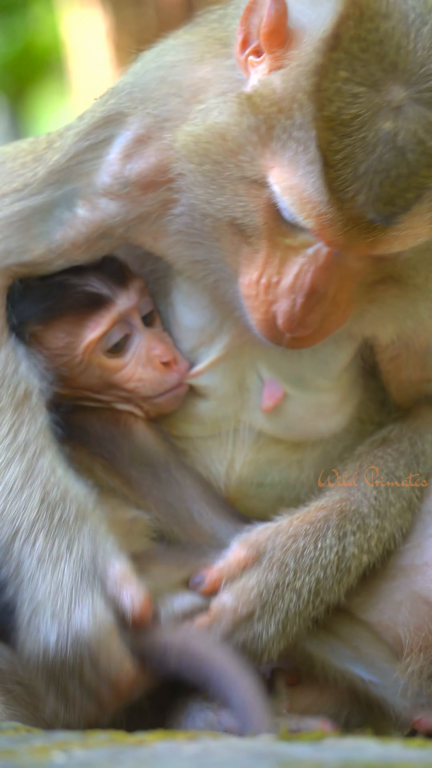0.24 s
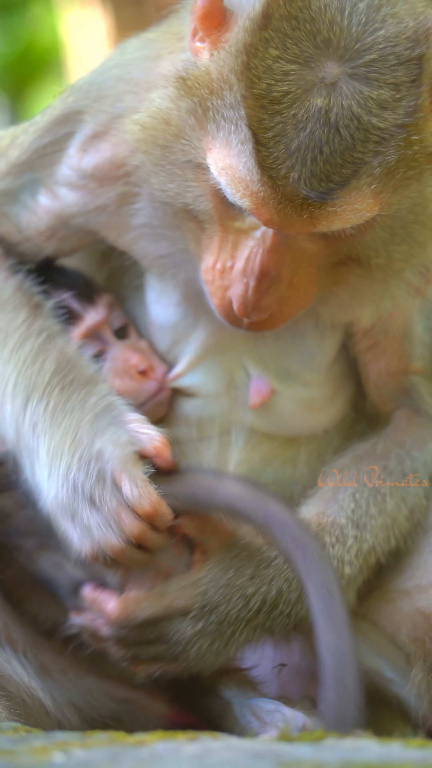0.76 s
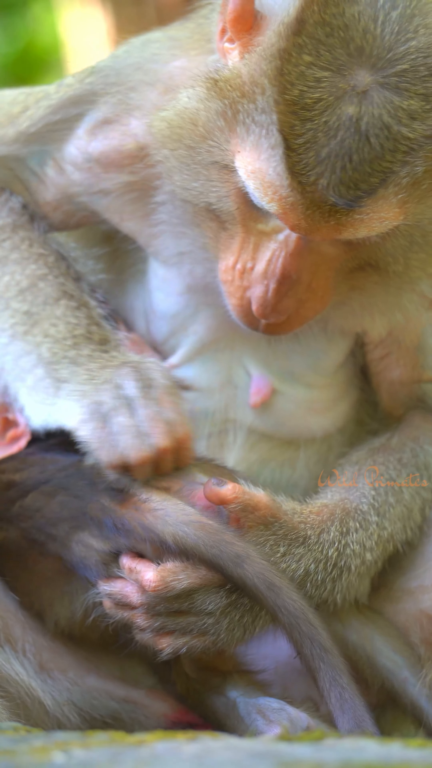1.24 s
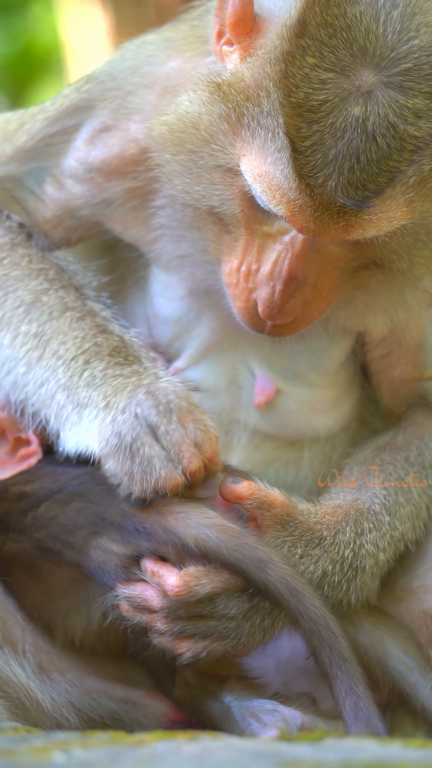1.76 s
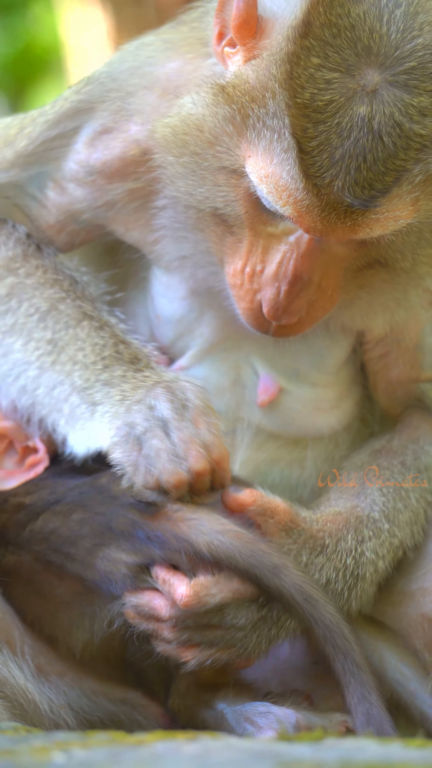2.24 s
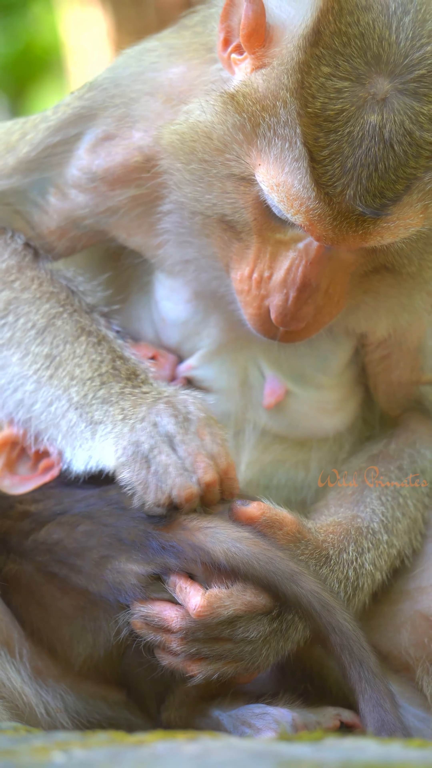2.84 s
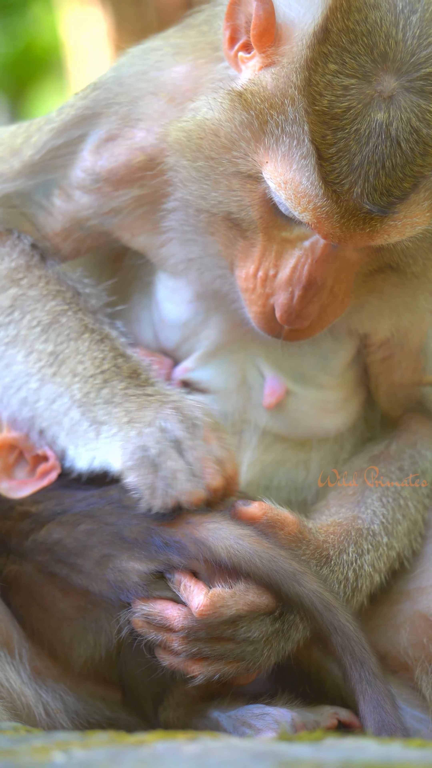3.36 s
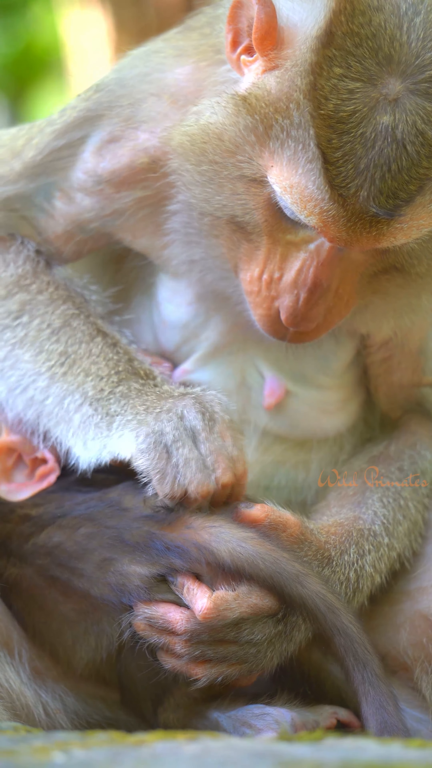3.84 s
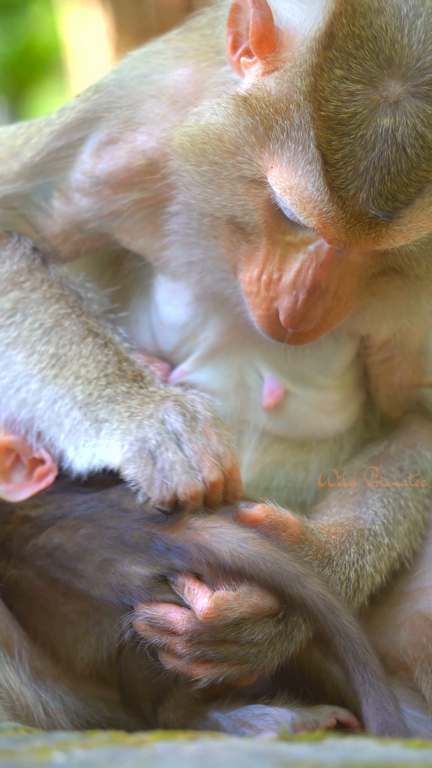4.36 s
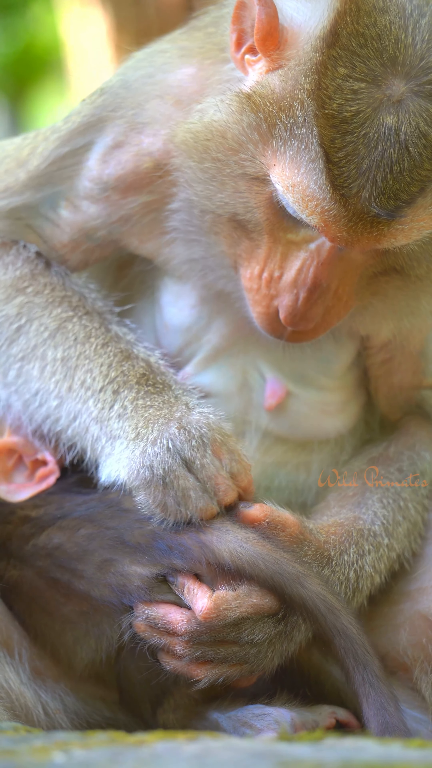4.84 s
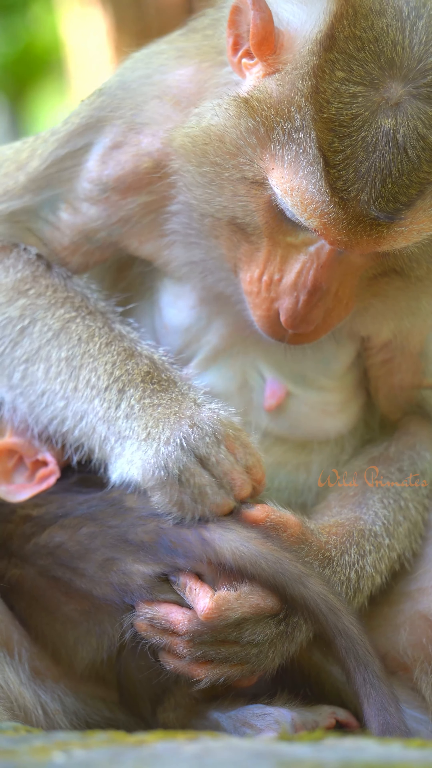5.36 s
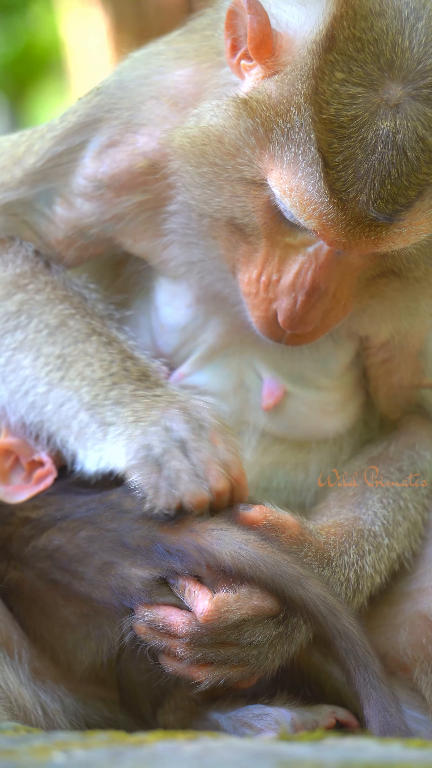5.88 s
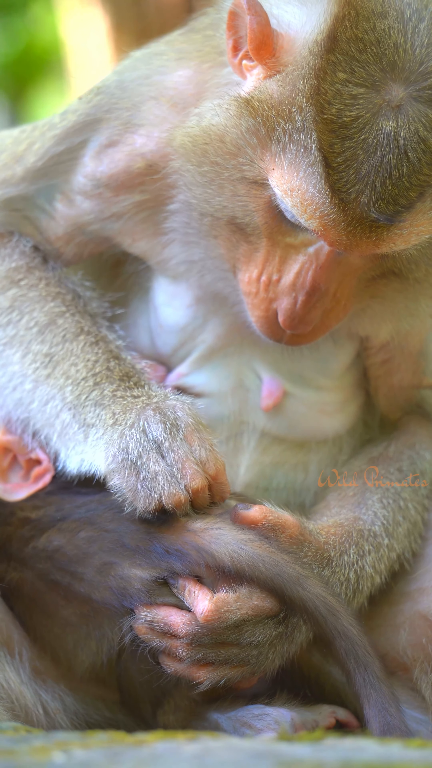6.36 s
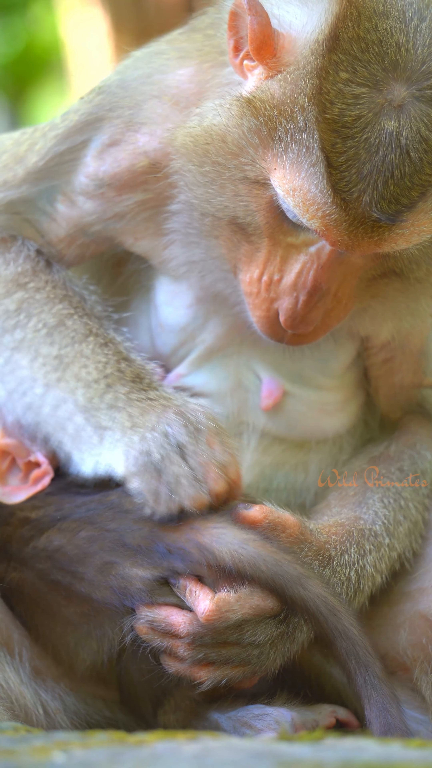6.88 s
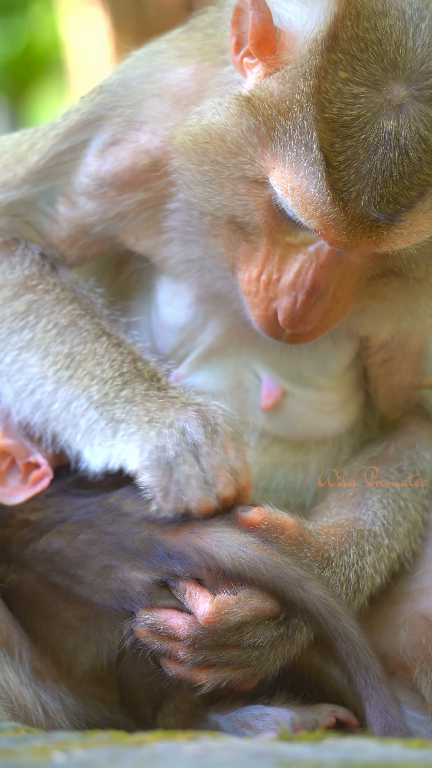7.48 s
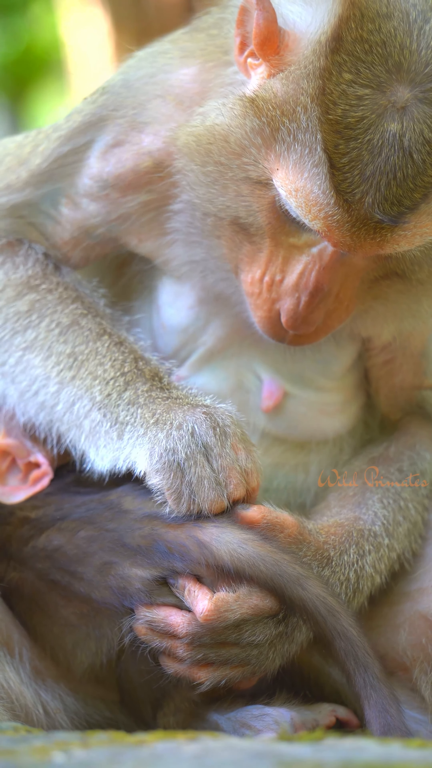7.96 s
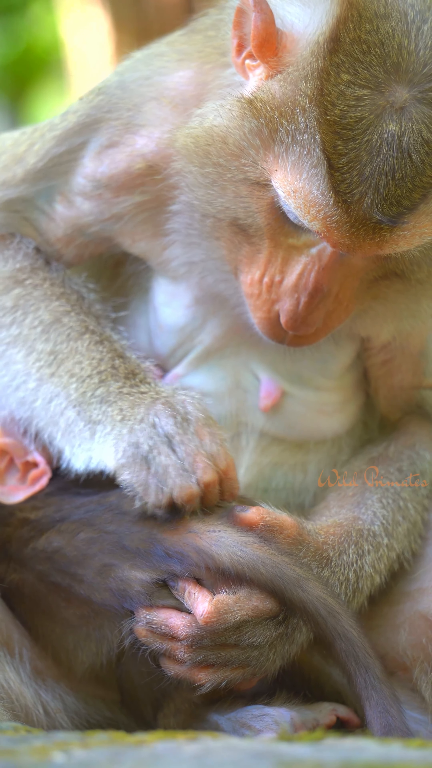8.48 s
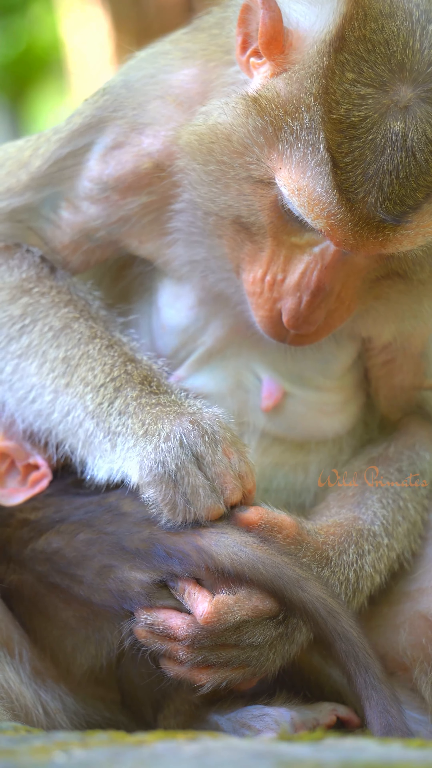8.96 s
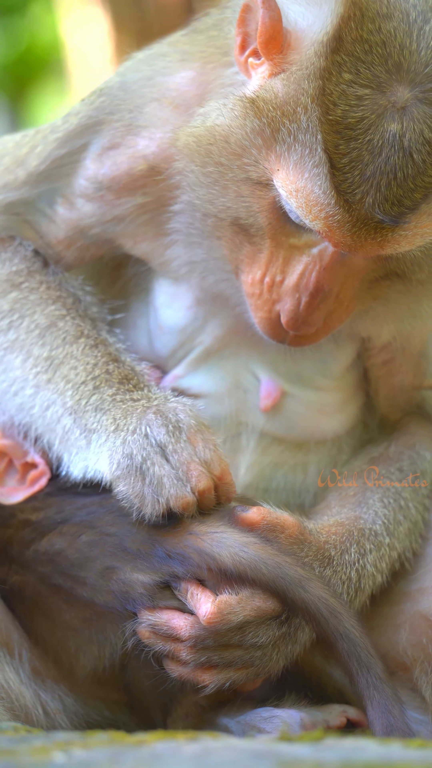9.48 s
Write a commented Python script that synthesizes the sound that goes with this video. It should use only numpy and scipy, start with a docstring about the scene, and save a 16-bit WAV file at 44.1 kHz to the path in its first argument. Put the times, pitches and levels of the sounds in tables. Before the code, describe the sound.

A close stereo microphone on a forest ledge catches quick crackly handling of dry leaves and twigs, slightly to the left, easing after the opening seconds into separate hard ticks and faint farther rustles. Thin insect hiss never stops, above a quiet low murmur and wavering drone. Tiny high chirps recur, a far vehicle rumbles by softly, and faint low trills and whistles come from distant trees.

```python
"""A ledge in a tropical forest where monkeys groom: low murmur, high cicada hiss and a far engine drone throughout.
Dry leaves rustle and twigs snap close by, a small bird chirps, others trill low and whistle afar, a far vehicle passes.
Air, cicadas, leaves and vehicle are shaped noise; the drone and birds are sines; snaps are rung resonances.
Birds and snaps also get noise-tail echoes that differ in each ear.
"""
import sys
import numpy as np
from scipy import signal
from scipy.fft import rfft, irfft, next_fast_len
from scipy.io import wavfile

SR = 44100
rng = np.random.default_rng(int(sys.argv[2]) if len(sys.argv) > 2 else 0)


def materialize(psi):
    """Save the field psi as 16-bit PCM at rate SR to the path in sys.argv[1].

    A 1-D psi becomes a single channel; in a 2-D psi each row is a channel.
    """
    bounded = np.clip(np.atleast_2d(psi).T, -1, 1)
    quanta = np.round(bounded * 32767).astype(np.int16)
    wavfile.write(sys.argv[1], SR, quanta)


N = 428652

# Left-right correlation of air and cicadas: freq_hz, correlation (0-1)
LIKENESS = [(60, 0.99), (130, 0.87), (290, 0.35), (640, 0.069), (3000, 0.23), (9000, 0.047), (15000, 0.21)]
# Spectrum of rustling leaves: freq_hz, relative_level_db
LEAVES = [(150, -23), (250, -5), (526, -1.5), (970, -2), (1260, 0), (1670, -0.5), (3640, 0), (3950, 0),
          (13000, -4.5)]
FOREST_T60_S = 0.96


def from_db(db):
    """Decibels to amplitude ratio."""
    return 10 ** (np.asarray(db) / 20)


def rms_of(x):
    """Root mean square."""
    return np.sqrt(np.mean(x ** 2))


def rms_one(x):
    """Scale to rms 1."""
    return x / np.sqrt(np.mean(x ** 2) + 1e-20)


def at_hz(points, hz):
    """Interpolate a table linearly over log frequency."""
    points = np.array(points)
    return np.interp(np.log(hz), np.log(points[:, 0]), points[:, 1])


def panned(x, pan_db):
    """Level difference between the ears; positive is left."""
    return x * from_db([[pan_db / 2], [-pan_db / 2]])


def drift(corner_hz):
    """Slow random signal of rms 1: noise through a double pole, run at SR / 40."""
    pole = np.exp(-80 * np.pi * corner_hz / SR)
    noise = rng.standard_normal(N // 40 + 2002)
    slow = signal.lfilter([1], [1, -2 * pole, pole * pole], noise)[2000:]   # settled part
    return np.interp(np.arange(N) / 40, np.arange(len(slow)), rms_one(slow))


def coloured(mid_side, spectrum, alike, low_hz, high_hz):
    """Shape two unrelated excitations to a spectrum and ear correlation; mono rms 1 from low_hz to high_hz."""
    size = next_fast_len(N)
    hz = np.maximum(np.fft.rfftfreq(size, 1 / SR), 1)
    like = np.clip(alike(hz), 0, .985)
    mid, side = rfft(mid_side, size) * from_db(at_hz(spectrum, hz))
    both = np.sqrt(1 + like) * mid + np.sqrt(1 - like) * side * np.array([[1], [-1]])
    inside = (hz > low_hz) & (hz < high_hz)
    band = irfft(both.mean(axis=0) * inside, size)
    return irfft(both, size)[:, :N] / rms_of(band)


def swells(rows):
    """Gain from rows of top_s, length_s, level_db: each is a bell in time; powers add."""
    t = np.arange(0, N + 64, 64) / SR
    depth_db = 13   # drop at half a length from the top
    power = sum(from_db(db - depth_db * (2 * (t - top_s) / length_s) ** 2) ** 2
                for top_s, length_s, db in rows)
    return np.interp(np.arange(N) / SR, t, np.sqrt(power))


def echoes(x, t60_s):
    """Scattering by trunks and stone: dense decaying echoes, unlike in each ear."""
    t = np.arange(int(t60_s * SR)) / SR
    tail = rng.standard_normal((2, len(t))) * from_db(-60 * t / t60_s)
    tail = tail * (1 - np.exp(-t / (0.059 * t60_s)))   # echoes need time to gather
    tail = tail / np.sqrt(np.sum(tail ** 2, axis=1, keepdims=True))
    return signal.fftconvolve(x[None], tail, axes=1)[:, :N]


def bandpass(x, order, low_hz, high_hz):
    """Butterworth band-pass."""
    return signal.sosfilt(signal.butter(order, [low_hz, high_hz], "band", fs=SR, output="sos"), x)


def add(out, start_s, sound):
    """Mix a sound in at its start."""
    i = round(start_s * SR)
    out[..., i:i + sound.shape[-1]] += sound[..., :N - i]


def tone(hz, gain):
    """Sine of varying pitch, phase summed from frequency."""
    return gain * np.sin(2 * np.pi * np.cumsum(hz) / SR)


def air():
    """Forest murmur: wide noise, mostly low, its level drifting slightly."""
    # Murmur spectrum: freq_hz, relative_level_db
    air_spectrum = [(15, -11), (25, -1), (40, -1), (80, 0), (125, -6), (160, -12.5), (250, -16), (500, -19),
                    (1000, -22.5), (2500, -26.5), (4500, -30.5), (9000, -34), (12000, -53)]
    noise = rng.standard_normal((2, N))
    murmur = coloured(noise, air_spectrum, lambda hz: at_hz(LIKENESS, hz), 608, 2950)
    return murmur * from_db(-60.2 + 0.5 * drift(6.2))


def cicadas():
    """Cicada chorus: high noise bands whose level flickers slightly."""
    # Chorus spectrum: freq_hz, relative_level_db
    chorus_spectrum = [(4120, -51), (7000, -23), (8040, -15.5), (9040, -6), (10300, -6), (12800, 3.5),
                       (14300, -1), (16000, -13.5)]
    noise = rng.standard_normal((2, N))
    hiss = coloured(noise, chorus_spectrum, lambda hz: at_hz(LIKENESS, hz), 10500, 16000)
    return panned(hiss * from_db(-48 + 0.5 * drift(27)), 5.0)


def engine_drone():
    """Far engine: low sines wavering in pitch and level."""
    # Engine tones before wavering: pitch_hz, peak_db
    engine_tones = [(35, -67), (54, -44.5)]
    waver_hz, waver_db = 1.218, 3   # rms
    return sum(tone(hz + waver_hz * drift(2.87), from_db(db + waver_db * drift(6.6)))
               for hz, db in engine_tones)


def near_rustle():
    """Leaves and fur dragged close by: clumped tiny cracks of uneven size over soft rubbing noise."""
    # Drags: top_s, length_s, level_db
    near_drags = [(.01, .1, -41.5), (.105, 0.045, -42.5), (.21, 0.31, -53), (.5, 0.56, -60.5),
                  (1.02, .18, -50.5), (1.15, 0.19, -54.5), (1.33, 0.084, -49), (1.405, 0.076, -42),
                  (1.52, 0.31, -45.5), (1.73, 0.16, -46.5), (1.9, 0.18, -48), (2.03, 0.15, -50.5),
                  (2.2, 0.29, -50.5)]
    cracks_per_s = 2500 * from_db(5 * drift(50))
    born = rng.random(N) < cracks_per_s / SR
    size_db = 4.9 * np.minimum(rng.exponential(1, N), 4)
    cracks = born * from_db(size_db) * rng.standard_normal((2, N))
    rubbing = 1.13 * rng.standard_normal((2, N)) * from_db(3.35 * drift(43))
    leaves = coloured(rms_one(cracks) + rubbing, LEAVES, lambda hz: 0.45 + 0 * hz, 2400, 4760)
    return panned(leaves * swells(near_drags), 6.3)


def far_rustle():
    """Rustling further off: fluttering noise without cracks, dulled by a low-pass."""
    # Drags further off: top_s, length_s, level_db (before the low-pass)
    distant_drags = [(3.75, 1.0, -64.5), (7.4, 0.36, -60), (7.95, 1.0, -63), (9.3, .8, -62)]
    cut_hz = 3540
    grain = rng.standard_normal((2, N)) * from_db(3.6 * drift(22))
    leaves = coloured(grain, LEAVES, lambda hz: 0.48 + 0 * hz, 1100, 2530)
    dulled = signal.sosfilt(signal.butter(2, cut_hz, fs=SR, output="sos"), leaves)
    return dulled * swells(distant_drags)


def snaps():
    """Twigs and dry leaves snap: a break and faint splinters excite a ring, a low knock and a treble crack."""
    # Snaps: start_s, ring_peak_db (before echoes and pan), ring_hz, crack_db (re ring)
    snap_rows = [(0.015, -18.5, 1150, -18), (0.096, -18, 2800, -3), (0.139, -27, 1260, -3),
                 (0.204, -31.5, 3030, -13), (0.267, -30.5, 1840, -22), (0.484, -35, 1700, -11),
                 (0.617, -38.5, 1400, -15), (1.113, -39.5, 925, -12), (1.182, -23.5, 4250, -7),
                 (1.317, -28, 4200, -11), (1.355, -19.5, 5050, -17), (1.388, -17.5, 3870, -18),
                 (1.416, -20.5, 3950, -12), (1.576, -34, 996, -11), (1.601, -30.5, 970, -5),
                 (1.802, -19.5, 3630, -6), (1.923, -22.5, 2770, 2), (2.0, -21, 2360, -6),
                 (2.053, -32, 3490, -11), (2.151, -31, 2500, -21), (2.194, -35, 1340, -8),
                 (2.233, -25, 1690, 4), (2.275, -28, 4160, -14), (2.895, -24.5, 1870, 4),
                 (2.928, -9.5, 4220, -9.5), (3.331, -34, 5300, -15), (3.991, -25.5, 2000, -19),
                 (4.3953, -11.5, 1640, -22), (4.75, -27.5, 5830, -2), (5.4105, -12.5, 2800, -16),
                 (6.413, -18, 5030, -9), (7.355, -41, 1570, -16), (8.062, -39, 700, -14),
                 (8.387, -39, 2180, 3), (8.541, -36, 5290, -15), (8.868, -35, 2090, -15),
                 (9.409, -38, 1620, 10)]
    ledge_t60_s, knock_db = 0.03, -10   # knock re ring
    out, t = np.zeros(N), np.arange(round(.02 * SR)) / SR
    for start_s, peak_db, ring_hz, crack_db in snap_rows:
        splinters = 0.08 * rng.standard_normal(len(t)) * from_db(-60 * t / 0.022)
        splinters[0] += 1   # the break
        ring = bandpass(splinters, 2, ring_hz / 1.42, ring_hz * 1.41)
        crack = bandpass(splinters, 1, 4200, 9500)
        knock = bandpass(splinters, 1, 350, ring_hz / 1.3)
        snap = ring / abs(ring).max()
        snap -= from_db(knock_db) * knock / abs(knock).max()
        snap -= from_db(crack_db) * crack / abs(crack).max()
        add(out, start_s + .0016, from_db(peak_db) * snap)   # placed 1.6 ms after start_s
    return panned(out + from_db(-6.5) * echoes(out, ledge_t60_s), 5.2)


def low_trills(waver):
    """Pulsed hoots: a sine in squared-sine pulses, rising from 5.7 % below its pitch."""
    # Trills: start_s, level_db (before mixing), pitch_hz, pulses_per_s, length_s
    trill_rows = [(.96, -44, 925, 26, 0.14), (4.949, -41, 924, 27.7, 0.13), (8.891, -44.5, 913, 28.3, 0.18)]
    out = np.zeros(N)
    for start_s, level_db, pitch_hz, pulses_per_s, length_s in trill_rows:
        t = np.arange(round(length_s * SR)) / SR
        pulses = np.sin(np.pi * pulses_per_s * t) ** 2
        envelope = np.sin(np.pi * (t / length_s) ** 0.66) ** 0.4
        wobble = 0.7 * waver[round(start_s * SR):][:len(t)]
        hz = pitch_hz * (1 - 0.0574 * np.exp(-t / 0.05) + wobble)
        add(out, start_s, from_db(level_db) * pulses * envelope * tone(hz, 0.91))
    return out


def far_whistles(waver):
    """Soft sine whistles, each bending up while pitch and level waver."""
    # Whistles: start_s, length_s, middle_pitch_hz, level_db (before waver and mixing)
    whistle_rows = [(.36, 0.029, 1855, -48), (3.612, 0.57, 1280, -67), (4.091, 0.33, 3040, -63),
                    (4.244, 0.045, 1590, -61), (4.32, 0.044, 1634, -51.5), (4.413, .045, 1735, -56),
                    (4.54, 0.029, 1880, -54), (4.6, 0.099, 2500, -58), (4.7, 0.36, 2680, -61.5),
                    (5.005, 0.022, 1840, -46.5), (5.099, 0.03, 1780, -56), (5.443, .05, 2700, -64),
                    (8.93, 0.095, 1610, -59), (9.061, 0.036, 1690, -52), (9.122, .027, 1665, -56),
                    (9.178, .023, 1890, -55), (9.134, .027, 2290, -60), (9.227, 0.056, 2415, -59),
                    (9.28, .031, 2530, -61), (9.34, 0.045, 2690, -57), (9.497, .16, 2735, -63),
                    (9.6, .11, 1500, -60), (9.64, .032, 1850, -52)]
    rise_hz = 39.6
    out = np.zeros(N)
    for start_s, length_s, middle_hz, level_db in whistle_rows:
        along = np.linspace(0, 1, round(length_s * SR))
        wobble = 0.86 * waver[round(start_s * SR):][:len(along)]
        hz = (middle_hz + rise_hz * (along - .5)) * (1 + wobble)
        add(out, start_s, tone(hz, from_db(level_db) * np.sin(np.pi * along) ** 0.22))
    return out * from_db(3.5 * drift(38))


def far_birds():
    """Low trills and far whistles, direct and scattered among the trees."""
    waver = 0.0124 * drift(44.0)   # relative pitch
    hoots, whistles = low_trills(waver), far_whistles(waver)
    direct = panned(hoots, 1.7) + from_db(-2.5) * whistles
    return direct + echoes(from_db(1.5) * hoots + whistles, FOREST_T60_S)


def chirps():
    """Small bird: a short sine, pitch arched and highest where loudest; near trunks blur it, far ones add a tail."""
    # Chirps: start_s, peak_db (before flutter, echoes and pan)
    chirp_rows = [(0.367, -46.5), (2.078, -44), (3.546, -47), (4.711, -44), (6.298, -44), (7.711, -44),
                  (9.666, -47.5)]
    length_s, top_s, top_hz, arch_hz_per_s2 = 0.05, 0.0114, 6586, 650000
    fade_db_per_s, flutter_db = 220, 3.0
    out, t = np.zeros(N), np.arange(round(length_s * SR)) / SR
    hz = top_hz - arch_hz_per_s2 * (t - top_s) ** 2
    attack = np.minimum(t / top_s, 1) ** 0.92
    fade = from_db(-fade_db_per_s * np.maximum(t - top_s, 0))
    release = np.minimum((length_s - t) / 0.0052, 1)
    bends = rng.normal(1, 0.0056, len(chirp_rows))   # pitch factor per chirp
    for (start_s, peak_db), bend in zip(chirp_rows, bends):
        add(out, start_s, tone(bend * hz, from_db(peak_db) * attack * fade * release))
    out = out * from_db(flutter_db * drift(96))
    near = panned(out + echoes(out, 0.31), 5.5)
    return near + from_db(-0.5) * echoes(out, FOREST_T60_S)


def traffic():
    """A vehicle passes far away: low band-passed noise swells and sinks."""
    pass_s, length_s, level_db = 3.52, 1.6, -56
    rumble = bandpass(rng.standard_normal(N), 2, 85, 162)
    return rms_one(rumble) * swells([(pass_s, length_s, level_db)])


def scene():
    """Sum of all sources."""
    background = air() + cicadas() + engine_drone()
    ledge = near_rustle() + far_rustle() + snaps()
    return background + ledge + far_birds() + chirps() + traffic()


def record(dry):
    """Steep elliptic low-pass cuts the top."""
    cutoff_hz = 15800
    return signal.sosfilt(signal.ellip(14, .3, 75, cutoff_hz, fs=SR, output="sos"), dry)


dry = scene()
out = record(dry)
materialize(out)
```